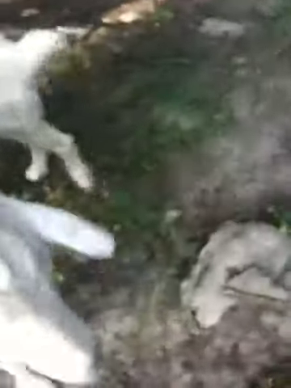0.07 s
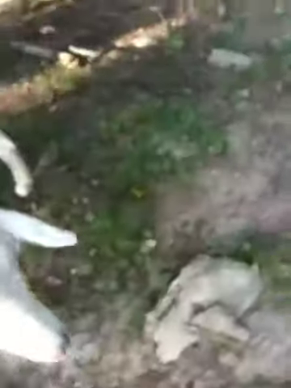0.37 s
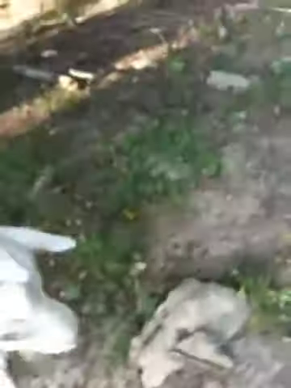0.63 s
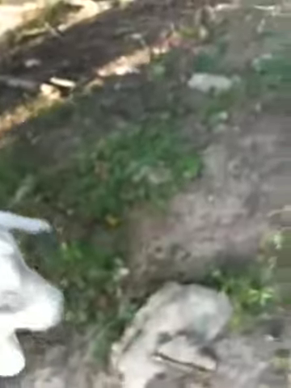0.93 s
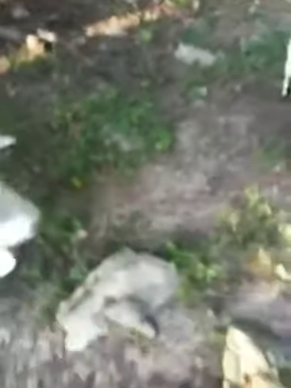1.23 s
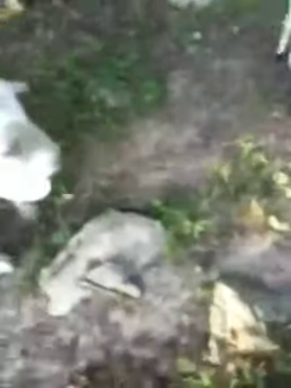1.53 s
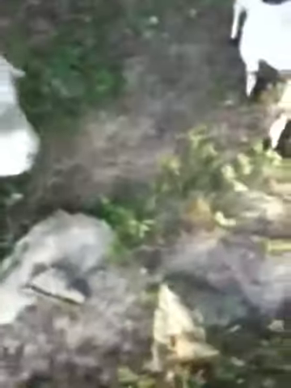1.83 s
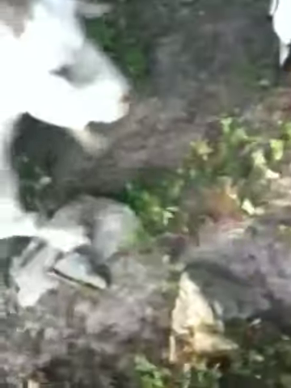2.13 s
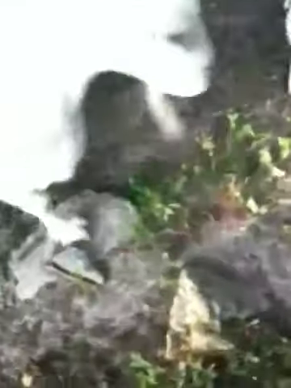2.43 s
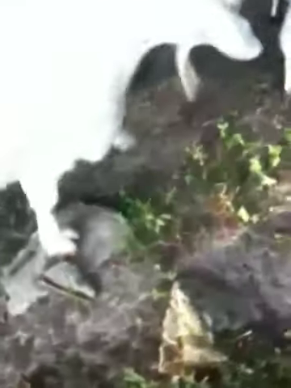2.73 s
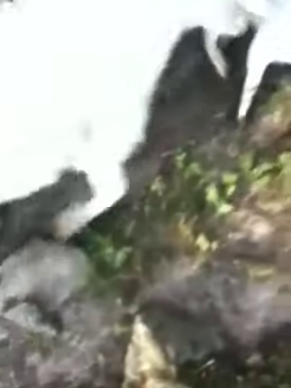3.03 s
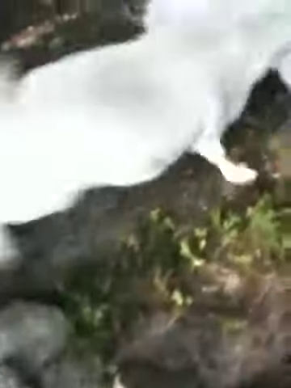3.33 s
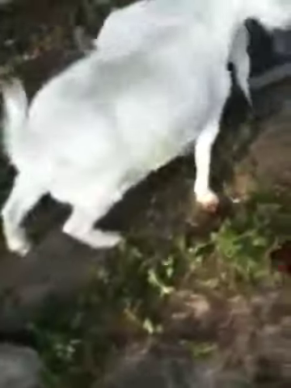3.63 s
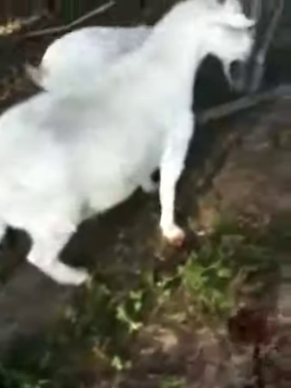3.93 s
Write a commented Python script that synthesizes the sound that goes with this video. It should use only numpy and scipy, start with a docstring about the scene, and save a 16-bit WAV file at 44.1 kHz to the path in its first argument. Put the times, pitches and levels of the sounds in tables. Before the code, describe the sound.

Sparse hoof steps of nearby goats crunch dry grass and knock pebbles outdoors, then thicken into sharper clacks, scuffs and heavier thuds. A distant hiss like insects hangs behind them, with no echo.

```python
"""Open ground of dirt, dry grass and a few rocks. Goats walk past close to one microphone; no echo.
Hooves thud on the earth, clack on stone, flick chips, knock pebbles and scuff through grit.
Dry stalks snap, and leaves crackle as legs brush through them.
Far behind lies a high hiss like an insect chorus, slowly swelling, over a faint rumble of open air."""
import sys
import numpy as np
from scipy import signal
from scipy.fft import rfft, irfft
from scipy.io import wavfile
from scipy.ndimage import uniform_filter1d

SR = 44100
rng = np.random.default_rng(int(sys.argv[2]) if len(sys.argv) > 2 else 0)


def unload_wav(signal):
    """Save mono or channel-first audio to the path in sys.argv[1] as 16-bit WAV at rate SR, clipped to [-1, 1]."""
    wavfile.write(
        sys.argv[1],
        SR,
        np.round(np.clip(np.atleast_2d(signal).T, -1, 1) * 32767).astype(np.int16),
    )


N = 176400
TIME = np.arange(N) / SR
SHORT = np.arange(SR // 10) / SR   # time within one impact

# spectrum of crackling dry grass: frequency_hz, gain_db
GRASS_SPECTRUM = [(1500, -32), (3000, 8), (5500, 7), (8000, 7.5), (11000, 3), (15500, -2)]


def hoof_thuds():
    """Soft earth takes the weight: a push swells and dies in a few cycles, and loose soil shudders."""
    # footfalls on earth: peak_s, peak_db, pitch_hz
    footfalls = [(0.067, -47, 235), (0.093, -44, 271), (0.379, -45.5, 344), (1.471, -48, 346),
                 (1.53, -44.5, 525), (1.641, -48, 174), (1.663, -43, 128), (1.673, -50, 144),
                 (2.013, -54, 483), (2.222, -49.5, 370), (2.901, -46.5, 161), (2.916, -49, 185),
                 (2.949, -48, 154), (3.029, -42.5, 310), (3.164, -49.5, 252), (3.229, -40, 234),
                 (3.237, -40, 380), (3.347, -40, 374), (3.466, -34.5, 248), (3.557, -41.5, 223),
                 (3.755, -48.5, 237), (3.818, -35, 233), (3.8447, -28.5, 157), (3.846, -36.5, 310),
                 (3.929, -35.5, 156)]
    rise_cycles, fall_cycles, settle_cycles = 0.83, 1.12, 3.46
    out = np.zeros(N)
    t = SHORT - SHORT.mean()   # zero at the peak
    for peak_s, db, hz in footfalls:
        cycles = t * hz
        swell = np.exp(-(cycles / np.where(t < 0, rise_cycles, fall_cycles)) ** 2)
        push = swell * np.cos(2 * np.pi * cycles)
        soil = rms_one(steep_resonance(rng.standard_normal(len(t)), 2 * hz, width=0.7))
        settling = np.exp(-(cycles / np.where(t < 0, rise_cycles, settle_cycles)) ** 2)
        add(out, peak_s + t[0], from_db(db) * (push + from_db(-21.5) * settling * soil))
    return out


def hoof_clacks():
    """The two claws of a hoof meet stone just after each other, ringing briefly and crushing grit."""
    # strikes on stone: start_s, level_db, centre_hz, width_ratio, second_claw_delay_s, second_claw_db
    strikes = [(3.0263, -36.5, 2940, 1.7, 0.0022, -3), (3.2299, -26.3, 2450, 0.88, 0.00193, -3.5),
               (3.2345, -37.5, 5000, 1.4, .0015, -10), (3.2482, -40, 6000, 1.6, 0.0042, -5),
               (3.4738, -41.5, 3000, 0.85, 0.0011, -1.5), (3.5025, -36.5, 1180, 1.1, .0022, -9.5)]
    # ringing of hoof and stone: pitch_hz, gain_db, t60_s
    modes = [(443, -19, 0.071), (920, -1.5, 0.011), (1182, -11.5, 0.029), (2266, -5, 0.012),
             (2740, -0.5, 0.0075), (3260, 0, 0.005), (3884, -3.5, 0.0079), (4270, -4.5, 0.0071),
             (5240, -7.5, 0.0086), (6380, -6.5, 0.017), (7700, -3.5, 0.011), (9900, -5, 0.011)]
    ring = sum((-1) ** k * from_db(db) * np.sin(2 * np.pi * hz * SHORT) * decay(t60_s)
               for k, (hz, db, t60_s) in enumerate(modes))
    out = np.zeros(N)
    for start_s, db, hz, width, second_s, second_db in strikes:
        for delay_s, claw_db in ((0, 0), (second_s, second_db)):
            grit = from_db(1) * rng.standard_normal(len(SHORT)) * decay(t60_s=0.011)
            clack = unit_impact(resonance(ring + grit, hz, width))
            add(out, start_s + delay_s, from_db(db + claw_db) * clack)
    return out


def stone_chips():
    """A flicked chip of stone rings with one note for a few milliseconds."""
    # flicked chips: start_s, level_db, pitch_hz
    chips = [(1.5773, -39.5, 6680), (2.0343, -48, 6700), (3.0315, -36, 3930), (3.231, -41, 1180),
             (3.5014, -43.5, 1410), (3.5035, -49, 990)]
    rise_s = 0.0006
    envelope = (1 - np.exp(-SHORT / rise_s)) * decay(t60_s=0.012)
    out = np.zeros(N)
    for start_s, db, hz in chips:
        add(out, start_s, from_db(db) * unit_impact(envelope * np.sin(2 * np.pi * hz * SHORT)))
    return out


def pebble_knocks():
    """Loose stones knock together dully: a burst of tiny fractures in one broad resonance."""
    # pebble contacts: start_s, level_db, pitch_hz
    contacts = [(0.201, -54, 1290), (0.2056, -44, 1100), (0.22, -52, 1370), (0.2338, -48.5, 1020),
                (0.242, -50.5, 2660), (0.365, -52, 925), (.471, -49, 1230), (0.88, -53, 1640),
                (0.9409, -51.5, 1100), (1.042, -49, 1750), (1.129, -55, 1170), (1.21, -55, 1840),
                (1.508, -60, 1480), (1.521, -45.5, 1900), (1.5778, -36.5, 2900), (1.593, -53.5, 2200),
                (1.607, -55, 2310), (1.7505, -45, 2790), (2.0334, -52, 1930), (2.865, -55, 1560),
                (2.994, -59, 1100), (3.028, -54, 930), (3.106, -50.5, 935), (3.2332, -37, 1190),
                (3.277, -59, 1500), (3.348, -54, 2400), (3.45, -49, 2900), (3.519, -53, 2000),
                (3.548, -54, 2600), (3.579, -48, 1390), (3.586, -45, 1700), (3.687, -46.5, 3360),
                (3.789, -49, 2370), (3.814, -44.5, 1280), (3.819, -46, 1490), (3.949, -53, 1700)]
    out = np.zeros(N)
    for start_s, db, hz in contacts:
        fractures = rng.choice([-1, 1], len(SHORT)) * decay(t60_s=0.0061)
        add(out, start_s, from_db(db) * unit_impact(steep_resonance(fractures, hz, width=0.6)))
    return out


def stalk_snaps():
    """A dry stalk breaks with a bright tick over a broader crack, then its fibres tear faintly."""
    # breaking stalks: start_s, level_db, pitch_hz
    breaks = [(.1512, -49, 8050), (.1965, -41.5, 8200), (0.208, -56, 9000), (.2145, -47, 8000),
              (.231, -49, 9000), (.242, -50, 9000), (.313, -46, 7000), (0.3272, -38, 7900),
              (.358, -53, 11000), (.3735, -48, 10000), (.4172, -42.5, 8000), (.455, -51, 10000),
              (0.4652, -47, 11000), (.556, -54, 11000), (.57, -49.5, 8500), (0.6075, -53.5, 11000),
              (.615, -53, 10000), (1.21, -51, 7000), (1.526, -54, 7500), (1.5779, -39, 5760),
              (1.593, -54, 5000), (1.607, -51, 5500), (1.776, -59, 8500), (1.7945, -54, 9500),
              (1.8078, -49, 8000), (1.9315, -55.5, 8900), (2.0331, -43, 7600), (2.061, -63, 10500),
              (2.687, -57, 9000)]
    out = np.zeros(N)
    for start_s, db, hz in breaks:
        tearing = from_db(-21) * rng.standard_normal(len(SHORT)) * decay(t60_s=0.009)
        tearing[0] = 1   # the clean break
        crack = unit_impact(resonance(tearing, hz, width=1))
        tick = unit_impact(resonance(crack, hz, width=1))
        add(out, start_s, from_db(db) * unit_impact(tick + from_db(-9) * crack))
    return out


def hoof_scuffs():
    """Each drag of a hoof swells and fades unevenly, setting off grains of dirt and dry grass."""
    # hoof drags: start_s, length_s, dirt_db, grass_db, grains_per_s
    drags = [(0.193, 0.11, -60, -54.5, 6200), (0.27, 0.24, -64.5, -63, 4800), (.49, 0.3, -67, -64, 3600),
             (0.837, 0.11, -65, -74, 1340), (1.028, 0.073, -54, -60.5, 7000),
             (1.083, 0.24, -62.5, -63, 3300), (1.275, 0.13, -87, -60.5, 9400),
             (1.443, 0.1, -60.5, -55.5, 10000), (1.494, 0.065, -50.5, -68, 3160),
             (1.51, 0.13, -59, -50.5, 3800), (1.696, 0.14, -67, -59.5, 3400),
             (2.175, 0.066, -62, -55.5, 2300), (2.332, 0.082, -65, -60.5, 5000),
             (2.66, 0.11, -78, -55, 6200), (2.814, 0.081, -67, -62, 2800), (2.976, 0.11, -55, -53, 3200),
             (3.048, 0.087, -54.5, -60, 8800), (3.093, 0.3, -65, -58, 5300),
             (3.22, 0.11, -52.5, -55, 13000), (3.336, 0.046, -52.5, -53, 13000),
             (3.348, 0.17, -61.5, -62, 8300), (3.434, 0.1, -51, -52, 9500),
             (3.488, 0.099, -52, -51.5, 2900), (3.542, 0.04, -50.5, -42.5, 13000),
             (3.567, 0.069, -48, -45, 7000), (3.587, .13, -58.5, -56.5, 7300),
             (3.717, 0.061, -63.5, -57, 3200), (3.771, 0.11, -52, -47.5, 22000),
             (3.848, 0.22, -57, -63, 3300)]
    # spectrum of scraped dirt: frequency_hz, gain_db
    dirt_spectrum = [(40, -33), (150, 10), (380, 7), (640, 0), (950, 6), (1150, 1), (1350, 6.5),
                     (1600, -2.5), (1850, 4), (2200, -0.5), (2650, 3), (3500, -6.5), (6000, -10),
                     (15000, -21)]
    rise_share = 0.25
    dirt_power, grass_power = np.zeros(N), np.zeros(N)
    for start_s, length_s, dirt_db, grass_db, _ in drags:
        stroke = rise_and_fall(start_s, length_s, rise_share)
        dirt_power += (from_db(dirt_db) * stroke) ** 2
        grass_power += (from_db(grass_db) * stroke) ** 2
    starts, lengths, _, _, rates = np.transpose(drags)
    per_s = np.interp(TIME, starts + rise_share * lengths, rates)
    dirt = np.sqrt(dirt_power) * crackle(dirt_spectrum, per_s, spread_db=3)
    grass = np.sqrt(grass_power) * crackle(GRASS_SPECTRUM, per_s, spread_db=2)
    crunch = from_db(3 * wobble(samples=150))   # the hoof catches and gives way
    return (dirt + grass) * crunch


def litter_ticks():
    """Dry litter gives stray ticks under the herd."""
    return from_db(-74.5) * crackle(GRASS_SPECTRUM, per_s=120, spread_db=2)


def leaf_rustles():
    """Fine dry leaves slide past a leg in a dense, bright crackle that swells and fades."""
    # passes of a leg: start_s, length_s, level_db
    passes = [(0.206, 0.17, -59), (.27, .17, -59), (.41, 0.11, -61), (0.473, 0.14, -57)]
    # spectrum of fine dry leaves: frequency_hz, gain_db
    leaf_spectrum = [(5000, -31), (7000, -9), (7900, 2.5), (9300, -8), (11500, 0), (13000, -10),
                     (15500, -17)]
    level = sum(from_db(db) * rise_and_fall(start_s, length_s) for start_s, length_s, db in passes)
    return level * crackle(leaf_spectrum, per_s=5000, spread_db=4.5)


def plant_brushing():
    """The goat nearest the microphone pushes through the plants: a light, continuous crackle."""
    start_s, fade_s = 2.97, 0.05
    fade_in = np.interp(TIME - start_s, [0, fade_s], [0, 1])
    return from_db(-61) * fade_in * crackle(GRASS_SPECTRUM, per_s=2800, spread_db=2)


def trills():
    """Narrow bands swell out of the far hiss and fade, like nearer insects."""
    # swells of one band: start_s, length_s, level_db, pitch_hz
    swells = [(0, 0.4, -60.5, 3840), (1.05, 0.72, -59, 3830), (1.1, .62, -60, 5420), (3.7, .5, -61, 5400)]
    out = np.zeros(N)
    for start_s, length_s, db, hz in swells:
        band = rms_one(steep_resonance(rng.standard_normal(N), hz, width=0.078))
        out += from_db(db) * np.sqrt(rise_and_fall(start_s, length_s)) * band
    return out


def far_hiss():
    """Three high bands of hiss, like a distant insect chorus, each swell and flutter on their own."""
    # spectra of the three bands: frequency_hz, gain_db
    low_spectrum = [(2000, -33), (2700, -17.5), (3000, -9), (3300, -2), (3600, 1), (3850, 1.5),
                    (4200, -0.5), (4700, -8), (6500, -32.5)]
    middle_spectrum = [(3600, -39), (4400, -4.5), (4850, 0), (5300, -6.5), (6500, -43)]
    high_spectrum = [(3500, -23), (4400, -6.5), (4900, -2.5), (5400, -1), (5900, -2), (6400, -5.5),
                     (6850, -8.5), (7400, -9.5), (9000, -22), (12000, -25), (15500, -35)]
    # slow swell of the outer bands, before their trims: time_s, low_db, high_db
    outer_swell = [(0, -54.5, -50.5), (0.2, -54, -49), (0.45, -55.5, -53.5), (0.7, -55.5, -55),
                   (0.95, -56, -56.0), (1.12, -53.5, -53), (1.4, -56, -51), (1.62, -59.5, -50.5),
                   (1.9, -54, -55.5), (2.15, -55.5, -56.0), (2.42, -55.5, -55), (2.62, -56.5, -52.5),
                   (2.82, -51, -51), (3.0, -56, -51.5), (3.18, -57.5, -56), (3.4, -53.5, -54),
                   (3.7, -53, -52.5), (3.95, -53.5, -49)]
    # slow swell of the narrow middle band: time_s, level_db
    middle_swell = [(0, -62.5), (.35, -63), (.7, -60), (1.05, -60), (1.45, -64), (1.85, -59), (2.3, -59.5),
                    (2.75, -58), (3.4, -56.5), (3.95, -67)]
    low_trim_db, high_trim_db, flutter_db = -3, -2.5, 0.94
    times, low_db, high_db = np.transpose(outer_swell)
    bands = ((low_spectrum, np.interp(TIME, times, low_db + low_trim_db)),
             (middle_spectrum, np.interp(TIME, *np.transpose(middle_swell))),
             (high_spectrum, np.interp(TIME, times, high_db + high_trim_db)))
    out = np.zeros(N)
    for spectrum, db in bands:
        level = from_db(db + flutter_db * wobble(samples=700))
        out += level * coloured(rng.standard_normal(N), spectrum)
    return out


def open_air():
    """The open air rumbles, faint and steady."""
    # spectrum of the air: frequency_hz, gain_db
    air_spectrum = [(25, -40), (48, -26), (70, -12.5), (110, 3.5), (160, 0.5), (250, 4), (400, -2),
                    (600, -5), (900, -8.5), (1300, -10), (2400, -15.5), (6000, -9.5), (15000, -59)]
    return from_db(-62) * coloured(rng.standard_normal(N), air_spectrum)


def crackle(spectrum, per_s, spread_db):
    """Grains click at random times and uneven sizes, in the spectrum of their material; rms 1."""
    sizes = from_db(spread_db * np.minimum(rng.exponential(1, N), 4.5))
    hits = rng.random(N) < per_s / SR
    clicks = hits * sizes * rng.choice([-1, 1], N)
    return coloured(clicks / np.sqrt(per_s), spectrum)   # equally loud at any rate


def coloured(x, spectrum):
    """Give a steady signal a spectrum; rms 1."""
    hz, db = np.transpose(spectrum)
    bins_hz = np.maximum(np.arange(N // 2 + 1) * SR / N, 1)
    gain = from_db(np.interp(np.log(bins_hz), np.log(hz), db))
    return rms_one(irfft(rfft(x) * gain, N))


def resonance(x, hz, width):
    """One resonance; its width is a share of its centre."""
    r = np.exp(-np.pi * width * hz / SR)
    return signal.lfilter([1, 0, -1], [1, -2 * r * np.cos(2 * np.pi * hz / SR), r * r], x)


def steep_resonance(x, hz, width):
    """The same resonance twice, for steeper skirts."""
    return resonance(resonance(x, hz, width), hz, width)


def decay(t60_s):
    """Exponential fall of 60 dB in t60_s."""
    return np.exp(-np.log(1000) * SHORT / t60_s)


def rise_and_fall(start_s, length_s, rise_share=0.5):
    """A straight rise to one and a straight fall to silence."""
    return np.interp(TIME, [start_s, start_s + rise_share * length_s, start_s + length_s], [0, 1, 0])


def wobble(samples):
    """Random drift, smoothed over this many samples; rms 1."""
    return rms_one(uniform_filter1d(rng.standard_normal(N), size=samples))


def unit_impact(x, contact_s=0.002):
    """Scale an impact so that its energy, spread over contact_s, has a level of 0 dB."""
    return x / np.sqrt(np.sum(x ** 2) / (contact_s * SR))


def rms_one(x):
    """Scale to an rms of one."""
    return x / np.sqrt(np.mean(x ** 2) + 1e-20)


def from_db(db):
    """Decibels to gain."""
    return 10 ** (np.asarray(db) / 20)


def add(out, start_s, sound):
    """Mix a sound in at start_s."""
    i = max(0, int(start_s * SR))
    out[i:i + len(sound)] += sound[:max(0, N - i)]


def scene():
    """Goats close by and the hiss far behind, in mono."""
    steps = hoof_thuds() + hoof_clacks() + stone_chips() + pebble_knocks() + stalk_snaps()
    rustling = hoof_scuffs() + litter_ticks() + leaf_rustles() + plant_brushing()
    background = trills() + open_air() + far_hiss()
    return (steps + rustling + background)[None]


def record(dry):
    """A steep low-pass cuts the highest treble."""
    cutoff_hz = 15900
    return signal.sosfilt(signal.ellip(10, 0.2, 70, cutoff_hz, fs=SR, output="sos"), dry)


dry = scene()
out = record(dry)
unload_wav(out)
```